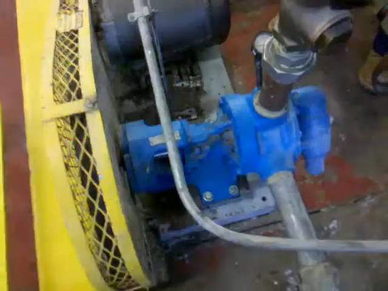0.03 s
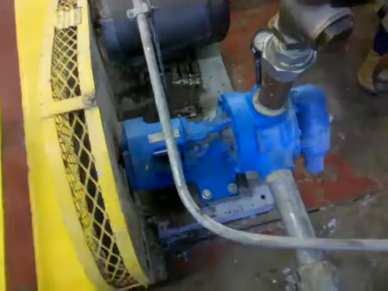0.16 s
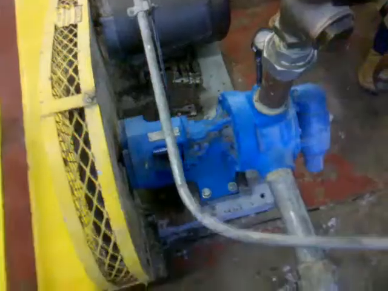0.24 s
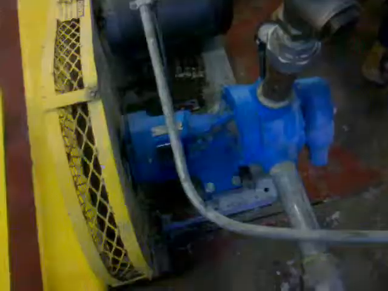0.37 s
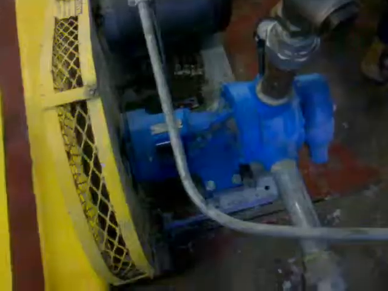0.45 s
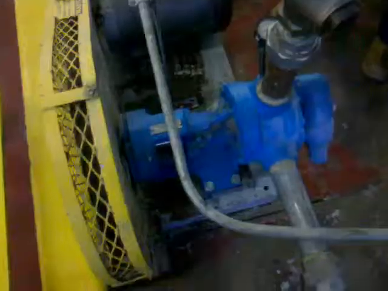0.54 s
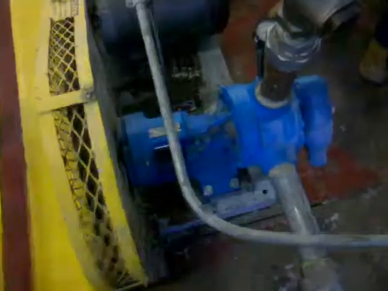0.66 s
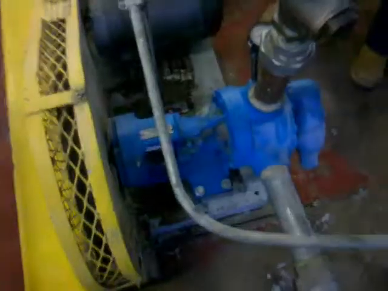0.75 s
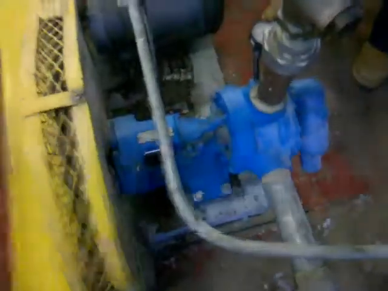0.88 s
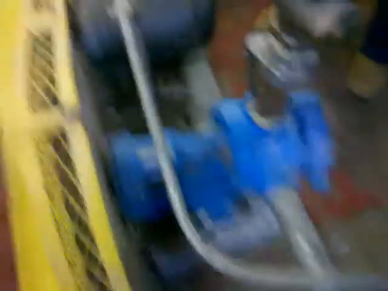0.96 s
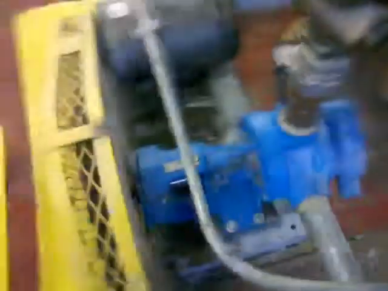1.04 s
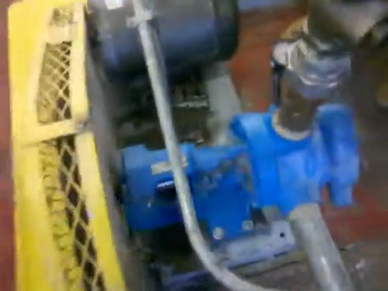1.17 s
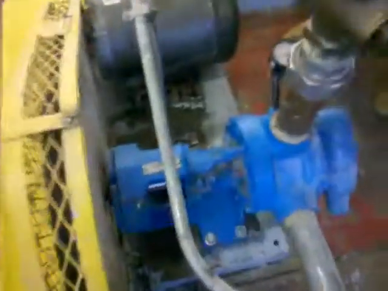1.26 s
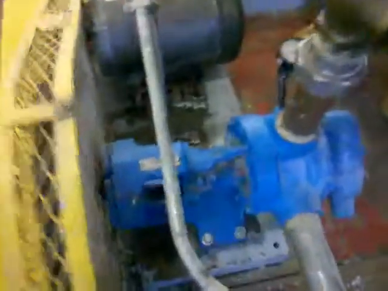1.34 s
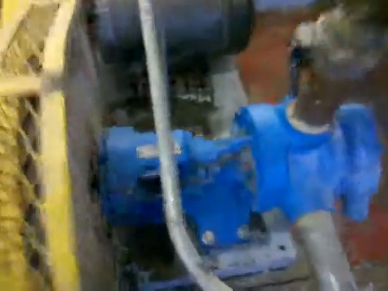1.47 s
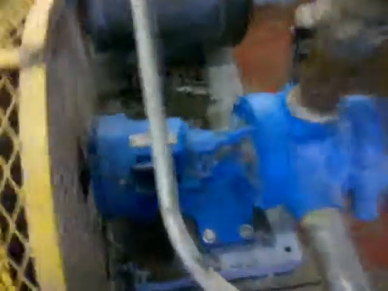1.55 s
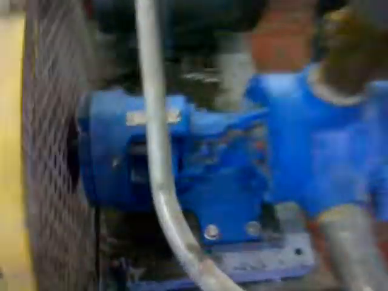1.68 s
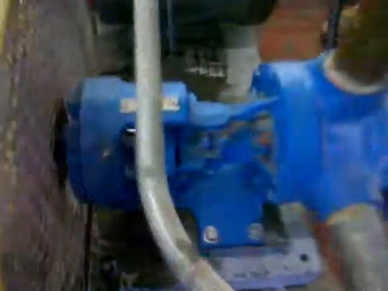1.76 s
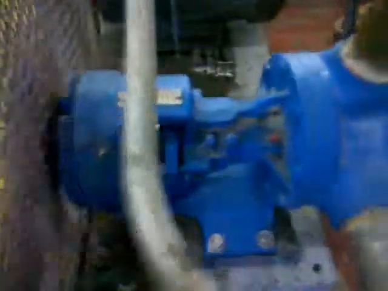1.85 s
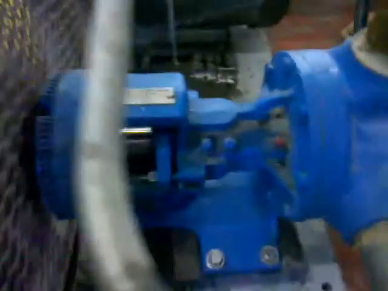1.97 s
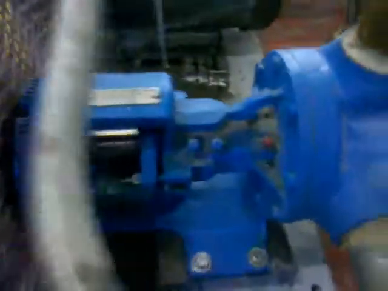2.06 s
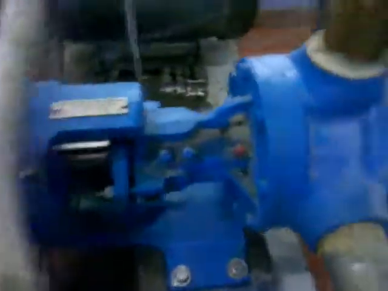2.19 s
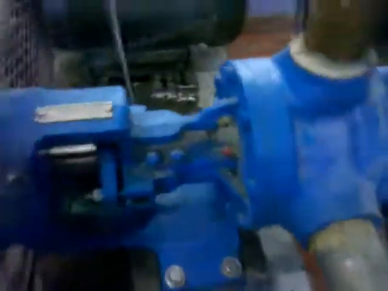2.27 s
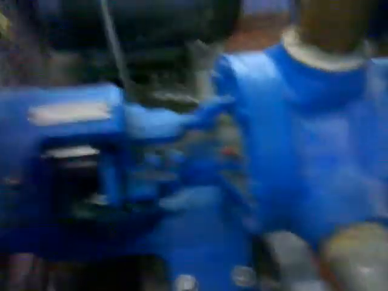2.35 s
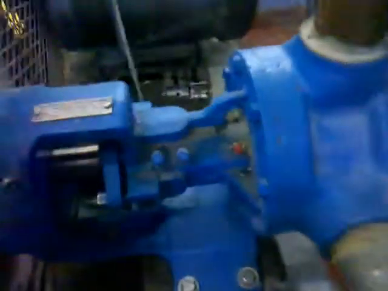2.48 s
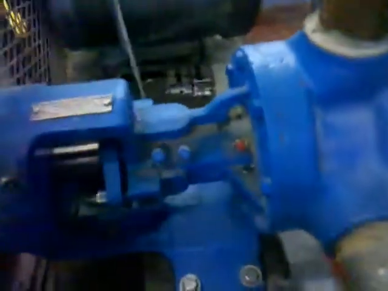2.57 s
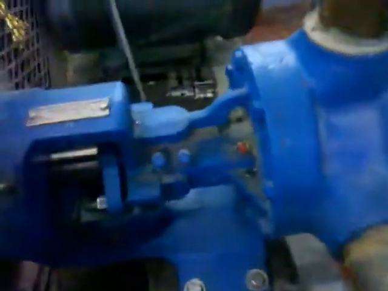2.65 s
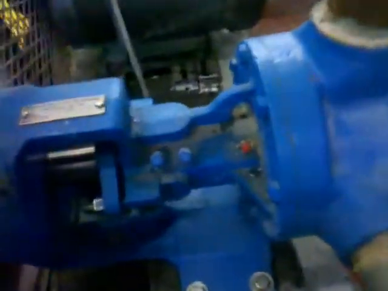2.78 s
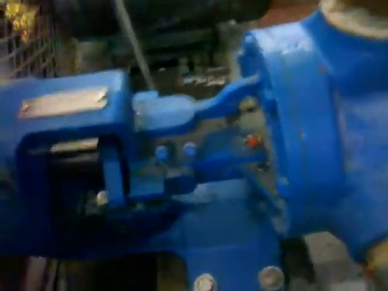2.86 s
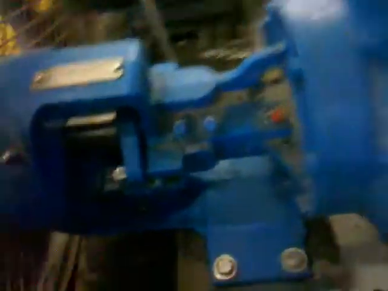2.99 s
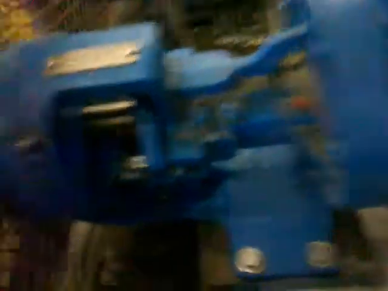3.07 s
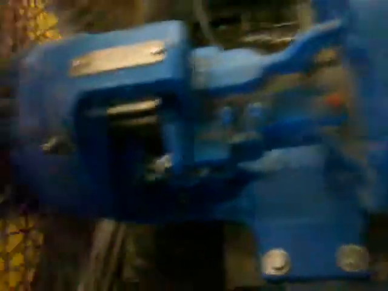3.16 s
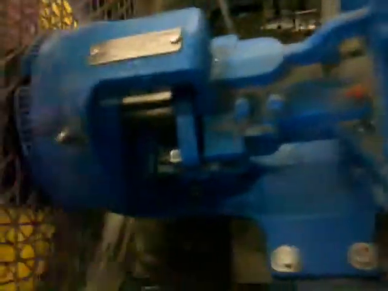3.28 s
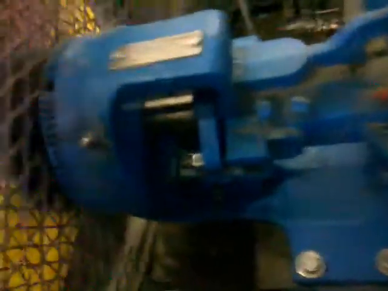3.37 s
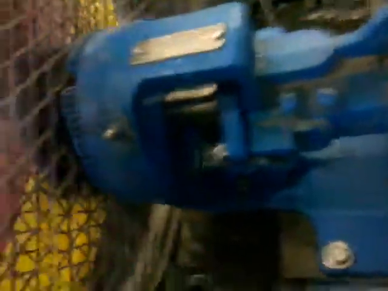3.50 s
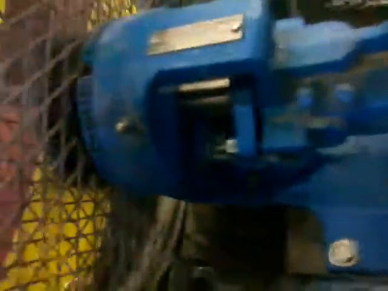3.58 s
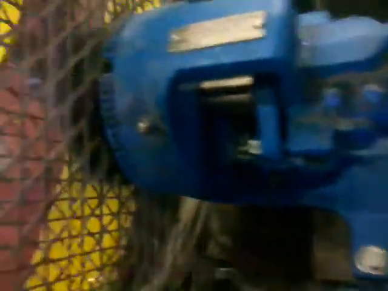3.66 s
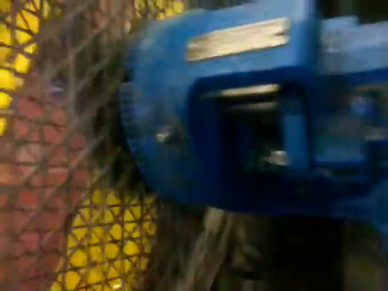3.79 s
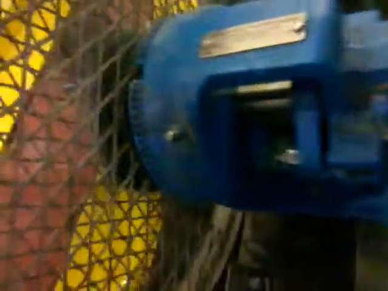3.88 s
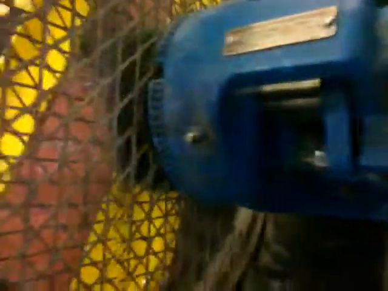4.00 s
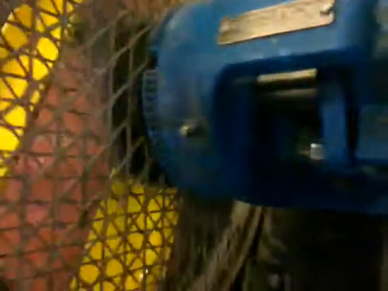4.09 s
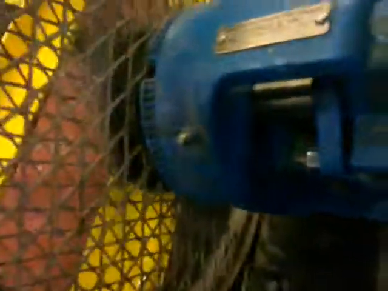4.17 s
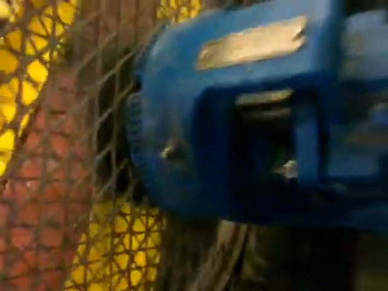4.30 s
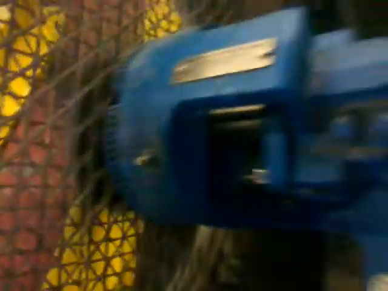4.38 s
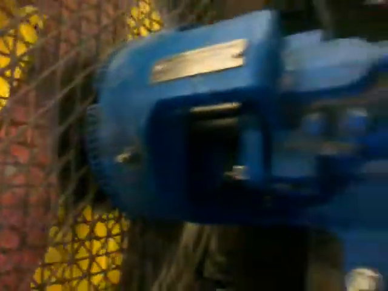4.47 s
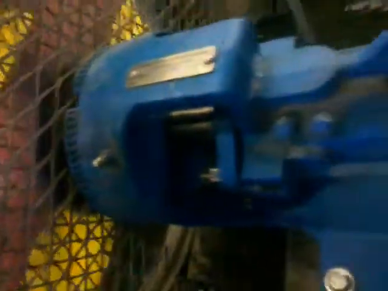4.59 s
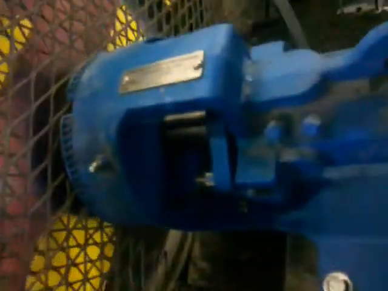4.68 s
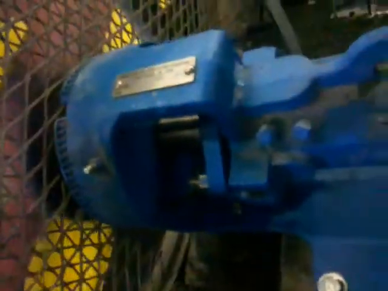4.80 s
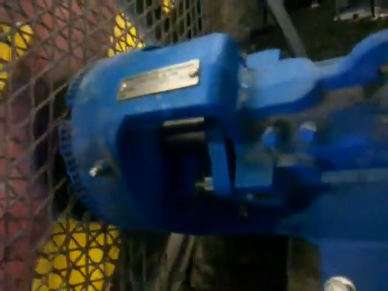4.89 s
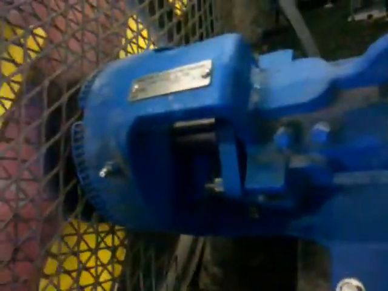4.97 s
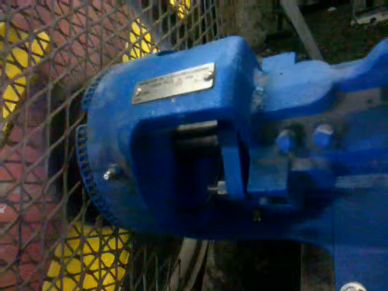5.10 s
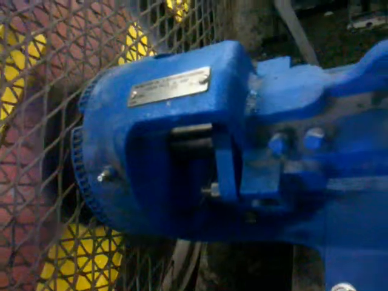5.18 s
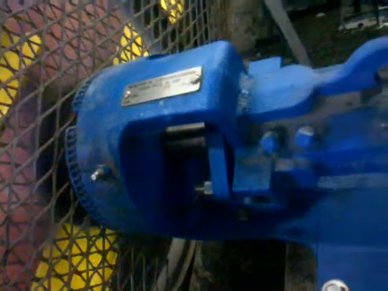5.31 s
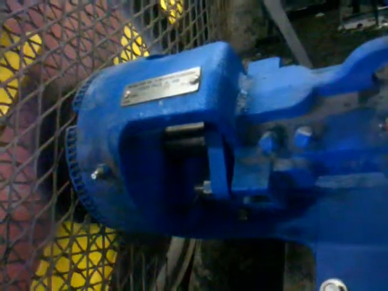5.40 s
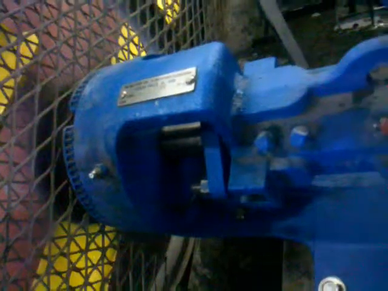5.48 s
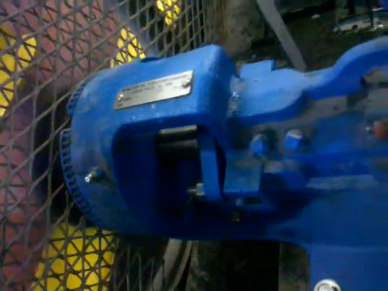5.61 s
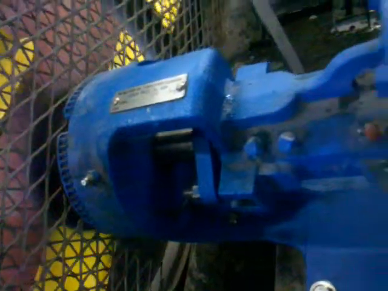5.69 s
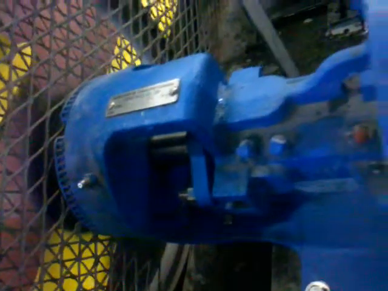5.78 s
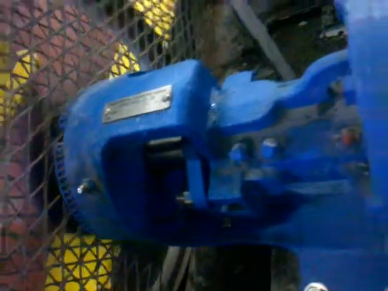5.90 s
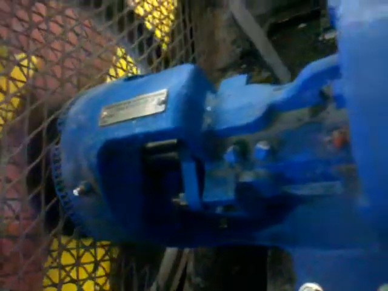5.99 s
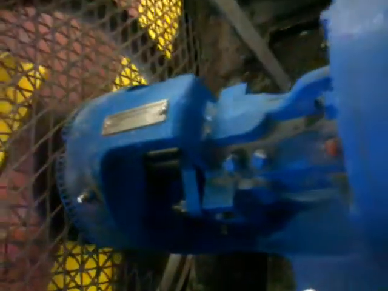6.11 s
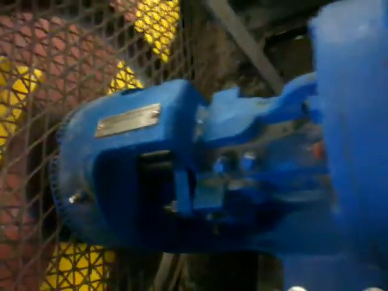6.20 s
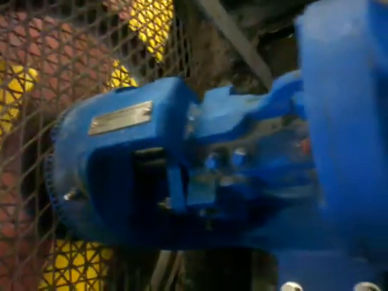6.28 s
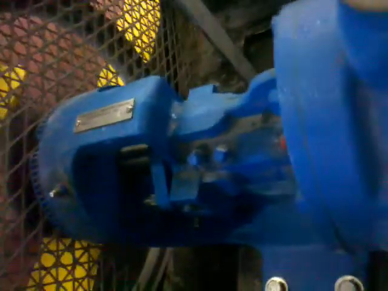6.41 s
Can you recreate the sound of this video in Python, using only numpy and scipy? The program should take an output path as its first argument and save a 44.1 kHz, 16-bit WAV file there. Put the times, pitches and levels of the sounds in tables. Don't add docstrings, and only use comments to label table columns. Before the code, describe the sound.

The first 0.3 seconds are silent, then an industrial gear pump fades in over about half a second, heard from two metres away in a factory hall with short echo. It makes a steady, buzzing mid-low hum, pulsed by very rapid gear-tooth knocks, about forty-four per second. Small plastic finger clicks and skin rubs land on the phone at 0.7 seconds and again around 0.95 to 1.03. From 1.5 to 3.5 the microphone moves in close; the machine grows much louder and drier, with metallic chatter, churning oil, fluttering belt and air hiss and a thin motor whine. Around 4.3 the aim swings toward the belt, the hiss brightening slightly and the casing knocks softening, then swings back. The pump runs on evenly at close range, its hum gently wavering, with one tiny shell tick at about 6.0 before the end near 6.4.

```python
import sys
import numpy as np
from scipy import signal
from scipy.fft import rfft, irfft, next_fast_len
from scipy.io import wavfile
from scipy.ndimage import uniform_filter1d

SR = 44100
rng = np.random.default_rng(int(sys.argv[2]) if len(sys.argv) > 2 else 0)


def to_wav(s):
    ch = np.atleast_2d(s).T
    pcm = np.round(np.clip(ch, -1, 1) * 32767)
    wavfile.write(sys.argv[1], SR, pcm.astype(np.int16))


def attenuation_scalar(level_db):
    decades = np.asarray(level_db, float) / 20
    return 10 ** decades


N = 284445
TIME = np.arange(N) / SR
FREQ = np.fft.rfftfreq(next_fast_len(N), 1 / SR)

# (hum [dB], casing knock [dB], bearing knock [dB], hiss [dB], rim knock [dB], late [ms])
TEETH = [
    (0, -1, -2, 0, -1, .07),
    (0, -2.5, -2, .3, -2, .2),
    (-.5, -4, -2, 0, -5, .05),
    (-.5, -6, 0, .3, -8, .03),
    (-.5, -4, 0, .6, -7, .2),
    (.5, 0, -2, 0, -1, 0),
    (.5, 0, -5, -.8, 0, -.03),
    (0, 0, -4, -.4, 0, .03),
]
# (frequency [Hz], level [dB], t60 [s])
CASING_RINGS = [(1400, 2.5, 0.024), (1309, 0, 0.027), (1232, -8.5, 0.057), (1090, -12, 0.013),
                (1318, -13.5, 0.06), (1412, -13, 0.056)]
# (frequency [Hz], level [dB], t60 [s])
RIM_RINGS = [(1533, 10, 0.026), (1593, -3, 0.065), (1664, -6.5, 0.054)]
# (frequency [Hz], level [dB], t60 [s])
BEARING_RINGS = [(2033, -11.5, 0.3), (2464, 11, 0.014), (2666, 4, 0.025), (3016, 9, 0.015),
                 (3277, -4, 0.044), (3680, 0, 0.038)]
# (frequency [Hz], level [dB], t60 [s])
GUARD_RINGS = [(1517, 7, 0.033), (1544, 7, 0.028), (1600, -7, 0.025), (1800, -13, 0.017)]
# (frequency [Hz], level [dB], wander width [Hz])
WHINE_TONES = [(2419, -52, 5), (2452, -56, 16), (2645, -58, 30), (3024, -53, 7), (3237, -58, 8),
               (6027, -62, 24), (6559, -64, 20), (7706, -68, 20), (9712, -61, 20), (12056, -62, 20)]
# (frequency [Hz], density [dB per Hz])
OIL_CHURN = [(30, -34), (60, -24), (100, -16), (150, -15.5), (230, -13), (290, -8), (450, -1.5), (650, .5),
             (900, 1), (1100, -5), (1400, -7), (1750, -14), (2200, -22), (3000, -25)]
# (frequency [Hz], density [dB per Hz])
BELT_HISS = [(1200, -81), (1900, 0.5), (2500, -4), (3100, -2.5), (3400, -10.5), (3700, -4.5), (3830, -14.5),
             (4000, -3), (4300, -3), (4800, -13.5), (5600, -23.5), (5900, -13), (6500, -9), (8500, -11),
             (9300, -9.5), (9700, -3), (10800, -6.5), (12200, 1.5), (13000, -9.5), (14000, -8),
             (16000, -5.5)]
# (in the hall [dB], close [dB], left minus right [dB])
HUM_LINES = [(-14, -8, -2.5), (-17, -28.5, 23), (-8.5, -15, 4.5), (-8.5, -4.5, -8), (-5, -9, 3.5),
             (-12, -9, 0), (-21, -9, -16.5), (-6.5, 1, -3.5), (-7.5, 4, 2), (1, 2, -2), (1, 3, 7),
             (-4, 1.5, -8.5), (-3, -4.5, -9), (-2, 0.5, 1.5), (-45, -18.5, 39), (-4.5, -2.5, 6),
             (-6, 0.5, 0), (-6, 0.5, -3.5), (-6, -8.5, 9.5), (-12, -10.5, 16), (-6.5, -4.5, -8),
             (-43, -16, -22), (-9, -13.5, -2), (-27, -23, 10), (-20, -7.5, 15.5), (-5.5, -15, 7),
             (-17, -1.5, 11)]
# (time [s], line [Hz], level [dB], length [s])
STANDING_WAVES = [(0.47, 527, -0.5, .4), (0.67, 439, -5.5, 0.51), (0.91, 483, -14, 0.46),
                  (1.1, 220, -6.5, 0.29), (1.6, 220, 10, 0.59), (1.58, 351, 10, 0.32),
                  (1.33, 483, 7.5, 0.95), (1.7, 395, -11, 0.42), (1.6, 527, -15, 0.13),
                  (1.67, 1185, 8.5, 0.77), (2.7, 702, -3, 0.75), (2.9, 922, 11, 0.85), (2.98, 834, 3, 0.27),
                  (3.96, 659, 8, 1.9), (5.86, 307, 5.5, 0.95), (6.3, 659, -17, 0.23),
                  (6.22, 1229, 10.5, 0.35), (6.9, 1229, 9, 0.99), (4.9, 1273, -4, 1), (4, 1100, 14, 0.86),
                  (5.76, 571, 1.5, 1.9), (4.7, 878, 0.5, 0.64), (3.6, 439, 3, 1.24), (2.7, 702, -5, 0.27),
                  (6.5, 1009, 4, 0.6), (4.44, 351, -1, 0.62), (2.45, 834, 5.5, 2.3), (3.4, 351, -6, .5),
                  (3.2, 220, -5, 0.17), (1.5, 571, -1, .5), (1.14, 1009, -3, 0.95), (5.2, 1185, -12, 2.4),
                  (5.3, 1097, -4.5, 2), (3.26, 483, 3, 0.53), (3, 527, -2, .6), (2.83, 351, 1, 0.41)]
# (time [s], distance [m])
DISTANCE_M = [
    (.3, 1.97),
    (1.5, 1.63),
    (1.75, 1.15),
    (2.2, 0.89),
    (2.6, 0.77),
    (3.0, 0.56),
    (3.5, 0.43),
    (4.5, 0.37),
    (6.45, 0.36),
]
# (time [s], blows late [ms], casing [dB], rim [dB], bounce off the guard [dB])
SIGHT_LINE = [
    (.3, 0.89, -7.5, 6, 4),
    (1.5, .6, 2, 6, -8),
    (2.2, -.2, 3, 2, -29),
    (3.2, -.35, 2.5, -2.5, -33),
    (4.2, -.6, -1, -8, -21),
    (5.2, -.2, 0, 0, -11),
    (6.45, 0.42, -1, 5, -6),
]
# (time [s], peak level [dB], ring [Hz], top ring [Hz], brightness [dB])
FINGER_CLICKS = [
    (.7073, -15, 1700, 4200, 2),
    (.7084, -14, 1050, 2200, -8),
    (.9524, -15, 2300, 5400, 0),
    (.9970, -10, 800, 1500, -3),
    (1.0256, -21, 1500, 3800, 1),
    (1.0258, -19, 520, 900, -3),
]
# (time [s], peak level [dB])
SHELL_TICKS = [
    (.7075, -34),
    (.7195, -40),
    (.9524, -26),
    (.9698, -36),
    (.9972, -34),
    (1.0254, -33),
    (1.04, -41),
    (6.02, -25),
]
# (time [s], rms level [dB], length [s], thump level [dB])
SKIN_RUBS = [
    (.708, -42, .003, -60),
    (.950, -40, .004, -56),
    (.995, -33, .004, -52),
    (1.021, -35, .008, -55),
]
# (frequency [Hz], left leads [rad])
PORT_LEAD = [(0, 0), (260, 1.6), (690, -0.3), (1810, -0.5), (2580, 1.5), (3600, 3.1), (6030, 7.4),
             (6630, 7.2), (8100, 3.2), (8440, 3.3), (9470, 0.1), (9730, -0.1), (13700, -9.3), (14000, -9.5)]
# (frequency [Hz], left minus right [dB])
PORT_TILT = [(60, -.5), (130, -1), (260, -3.5), (370, -3), (600, 2.5), (1230, .6), (2400, .8), (4500, -.3),
             (13800, -.4)]
# (frequency [Hz], share heard alike [0-1])
PORT_ALIKE = [(40, .3), (120, 0.84), (500, 0.96), (1200, 0.86), (2000, 0.41), (4000, 0.84), (8000, 0.051),
              (13000, 0.5)]

TOOTH_HZ, KNOCK_AT = 43.9, .45
FIRST_LINE, LINE_WIDTH_HZ = 3, 20
HUM_DB = -27.5
CASING_DB, RIM_DB, GUARD_DB, BEARING_DB, HISS_DB = -3, -17.5, -23, -18, -15
REBOUND_S, REBOUND_DB = 0.002399, 14.5
BOUNCE_S, GUARD_LATE_S = 0.00223, 0.00156
FLOOR_S, FLOOR_DB = .0112, -10
HALL_M, CLOSE_M = 1.9, .8
HALL_CASING_DB, HALL_GUARD_DB, HALL_BEARING_DB, HALL_TREBLE_DB = -3, 12.5, -5.5, -5
HALL_ECHO_DB, HALL_T60_S = -5.5, 0.13
HALL_DIP = 0.31
TURN_S, TURN_LENGTH_S = 4.35, 0.46
TURN_GUARD_DB, TURN_TREBLE_DB, TREBLE_HZ = -16, 4.5, 10200
CLICK_CYCLES, DENT_HZ = 6, 1200
FADE_START_S, FADE_LENGTH_S = .318, .58
TOP_HZ = 13780


def level(pair, db):
    middle = np.mean(pair, axis=0)
    return pair * attenuation_scalar(db) / np.sqrt(np.mean(middle ** 2))


def over_hz(table):
    hz, value = np.transpose(table)
    return np.interp(np.log(FREQ + 1), np.log(hz + 1), value)


def walk(rate):
    hold = int(SR / rate)
    steps = np.repeat(rng.standard_normal(N // hold + 1), hold)
    return 1.26 * uniform_filter1d(uniform_filter1d(steps, hold), hold)[:N]


def bump(s, length_s):
    return np.exp(-((TIME - s) / length_s) ** 2)


def later(pair, s):
    return np.roll(pair, int(s * SR), axis=1)


def filtered(x, order, hz, kind):
    return signal.sosfilt(signal.butter(order, hz, kind, fs=SR, output="sos"), x)


def ports(x, other=None):
    lead, tilt = over_hz(PORT_LEAD), attenuation_scalar(over_hz(PORT_TILT) / 2)
    size = next_fast_len(N)
    left = rfft(x, size)
    if other is None:
        alike, right = .97, left
    else:
        alike = np.clip(over_hz(PORT_ALIKE), 0, .97)
        right = alike * left + np.sqrt(1 - alike ** 2) * rfft(other, size)
    middle = np.sqrt(tilt ** 2 + tilt ** -2 + 2 * alike * np.cos(lead)) / 2
    turn = np.exp(.5j * lead)
    pair = np.array([left * turn * tilt, right / turn / tilt])
    return irfft(pair / np.maximum(middle, .4), size)[:, :N]


def rings(x, modes):
    out = 0
    for hz, db, t60 in modes:
        pole = np.exp(2j * np.pi * hz / SR - np.log(1000) / (t60 * SR))
        out = out + attenuation_scalar(db) * signal.lfilter([1], [1, -pole], x).imag
    return filtered(out, 2, 350, "high")


def over_teeth(column):
    place = TIME * TOOTH_HZ - KNOCK_AT
    return np.interp(place, np.arange(8), np.array(TEETH)[:, column], period=8)


def echo(pair):
    t = np.arange(int(HALL_T60_S * SR)) / SR
    tail = rng.standard_normal((2, len(t))) * attenuation_scalar(-60 * t / HALL_T60_S)
    tail = tail / np.sqrt(np.sum(tail ** 2, axis=1, keepdims=True))
    return signal.fftconvolve(pair, tail, axes=1)[:, :N]


def rush(table, flicker_db, pulse_db):
    size = next_fast_len(N)
    noise = rfft(rng.standard_normal((2, size))) * attenuation_scalar(over_hz(table))
    out, octave = 0, np.log2(FREQ + 1)
    for centre in np.arange(4.5, 14.5, .5):
        band = np.cos(np.pi * np.clip(octave - centre, -.5, .5))
        flicker = attenuation_scalar(flicker_db * (walk(3.602) + walk(20)))
        out = out + flicker * irfft(noise * band, size)[:, :N]
    mesh = np.exp(-((TIME * TOOTH_HZ - KNOCK_AT) % 1) / .15)
    return ports(*(out * attenuation_scalar(pulse_db * mesh + over_teeth(column=3))))


def whine():
    out = 0
    for hz, db, width in WHINE_TONES:
        phase = 2 * np.pi * np.cumsum(hz + width / 2 * walk(30)) / SR
        out = out + np.sqrt(2) * attenuation_scalar(db + 2.84 * walk(20)) * np.sin(phase)
    return ports(out)


def clicks():
    out = np.zeros(N)
    for s, db, hz, top_hz, bright_db in FINGER_CLICKS:
        t60 = CLICK_CYCLES / hz
        snap = np.sign(DENT_HZ - hz) * np.exp(-((TIME - s) * top_hz / .2) ** 2)
        modes = [(hz, 0, t60), (1.3 * hz, -4, .7 * t60), (top_hz, bright_db, CLICK_CYCLES / top_hz)]
        click = filtered(rings(snap, modes), 2, .6 * hz, "high")
        out += attenuation_scalar(db) * click / np.abs(click).max()
    thin = np.diff(rng.standard_normal(N + 1))
    for s, db in SHELL_TICKS:
        out += attenuation_scalar(db) * np.exp(-np.abs(TIME - s) / .0006) * thin
    grit = filtered(rng.standard_normal(N), 2, (400, 2200), "band")
    for s, db, length_s, thump_db in SKIN_RUBS:
        out += attenuation_scalar(db) * bump(s, length_s) * grit / grit.std()
        out += attenuation_scalar(thump_db) * bump(s, .008) * np.sin(2 * np.pi * 50 * (TIME - s))
    return ports(out)


def knocks(modes, column, scatter_db, jitter_s, rattle, band_hz):
    tooth = np.arange(int(N / SR * TOOTH_HZ))
    chance = rng.standard_normal((len(tooth), 2))
    teeth = np.array(TEETH)[tooth % 8]
    s = (tooth + KNOCK_AT) / TOOTH_HZ
    late_ms = teeth[:, -1] + np.interp(s, *np.transpose(SIGHT_LINE)[:2])
    at = (s + late_ms / 1000 + jitter_s * chance[:, 0]) * SR
    blows = np.zeros(N)
    blows[at.astype(int)] = attenuation_scalar(teeth[:, column] + scatter_db * chance[:, 1])
    tail = signal.lfilter([1], [1, -np.exp(-1 / (.008 * SR))], blows)
    noise = rattle * tail * rng.standard_normal((2, N))
    return -ports(*(rings(filtered(blows + n, 2, band_hz, "band"), modes) for n in noise))


def hum(hall):
    out, power = 0, 0
    for k, (hall_db, close_db, _) in enumerate(HUM_LINES, FIRST_LINE):
        crests_db = 0
        for s, hz, db, length_s in STANDING_WAVES:
            if abs(hz - k * TOOTH_HZ) < LINE_WIDTH_HZ:
                crests_db = crests_db + db * bump(s, length_s)
        gain = attenuation_scalar(close_db + hall * (hall_db - close_db) + crests_db)
        waver = attenuation_scalar(walk(2) + .4 * walk(20))
        drift = .12 * walk(3) + .05 * walk(20)
        scatter = np.pi * (.32 * k ** 2 + .52 * k + .82) + .8 * rng.standard_normal()
        path = np.array([[0], [np.pi / 2 * (-1) ** (k // 2)]])
        out = out + gain * waver * np.sin(2 * np.pi * k * TOOTH_HZ * TIME + scatter + drift + path)
        power = power + gain ** 2
    pair = ports(*(out / np.sqrt(power) * attenuation_scalar(over_teeth(column=0))))
    line = FREQ / TOOTH_HZ - FIRST_LINE
    pan_db = np.interp(line, np.arange(len(HUM_LINES)), np.transpose(HUM_LINES)[-1])
    size = next_fast_len(N)
    return irfft(rfft(pair, size) * attenuation_scalar(np.array([pan_db, -pan_db]) / 2), size)[:, :N]


def scene():
    metres = np.interp(TIME, *np.transpose(DISTANCE_M))
    hall = np.clip(np.log(metres / CLOSE_M) / np.log(HALL_M / CLOSE_M), 0, 1)
    turn = bump(TURN_S, TURN_LENGTH_S)
    sight = np.transpose(SIGHT_LINE)
    casing_db, rim_db, bounce_db = (np.interp(TIME, sight[0], row) for row in sight[2:])

    air = level(rush(BELT_HISS, flicker_db=1.25, pulse_db=4.5), 2.3)
    treble = signal.sosfiltfilt(signal.butter(2, TREBLE_HZ, "high", fs=SR, output="sos"), air)
    air = air + treble * (attenuation_scalar(HALL_TREBLE_DB * hall + TURN_TREBLE_DB * turn) - 1)
    dip = signal.sosfiltfilt(signal.butter(1, (4900, 6000), "band", fs=SR, output="sos"), air)
    air = air - HALL_DIP * np.sqrt(hall) * dip
    air = air * attenuation_scalar(.8 * walk(14))
    high = attenuation_scalar(HISS_DB) * (air + whine() * attenuation_scalar(37.5) / metres ** 0.3)

    casing = knocks(CASING_RINGS, column=1, scatter_db=.6, jitter_s=.00003, rattle=.005, band_hz=(1120, 1650))
    casing = casing + attenuation_scalar(bounce_db) * later(casing, BOUNCE_S)
    casing = level(casing, CASING_DB - 5.0) * attenuation_scalar(HALL_CASING_DB * hall + casing_db)
    rim = knocks(RIM_RINGS, column=4, scatter_db=1.2, jitter_s=.00004, rattle=.012, band_hz=(1350, 1800))
    rim = level(rim, RIM_DB) * attenuation_scalar(HALL_CASING_DB * hall + rim_db)
    guard = knocks(GUARD_RINGS, column=4, scatter_db=1, jitter_s=.00006, rattle=.02, band_hz=(1300, 2000))
    guard = later(level(guard, GUARD_DB), GUARD_LATE_S) * attenuation_scalar(HALL_GUARD_DB * hall + TURN_GUARD_DB * turn)
    bearing = knocks(BEARING_RINGS, column=2, scatter_db=1.2, jitter_s=.00015, rattle=.03, band_hz=(1800, 4800))
    bearing = bearing + attenuation_scalar(REBOUND_DB) * later(bearing, REBOUND_S)
    bearing = level(bearing, BEARING_DB) * attenuation_scalar(HALL_BEARING_DB * hall)
    bright = rim + guard
    blows = casing + bright + attenuation_scalar(FLOOR_DB) * later(bright, FLOOR_S) + bearing
    blows = blows + hall * attenuation_scalar(HALL_ECHO_DB) * echo(blows)

    low = level(hum(hall), -1.48) + level(rush(OIL_CHURN, flicker_db=1.86, pulse_db=0.0), -9.0)
    fade = np.sin(np.pi / 2 * np.clip((TIME - FADE_START_S) / FADE_LENGTH_S, 0, 1))
    return fade * attenuation_scalar(HUM_DB) / metres * (low + blows + high) + clicks()


def band_limit(x):
    return signal.sosfilt(signal.butter(12, 14390, fs=SR, output="sos"), x)


def record(dry):
    thin = filtered(dry, 2, 45, "high")
    cut = signal.sosfilt(signal.ellip(14, .5, 65, TOP_HZ, fs=SR, output="sos"), thin)
    return band_limit(cut)


dry = scene()
out = record(dry)
to_wav(out)
```